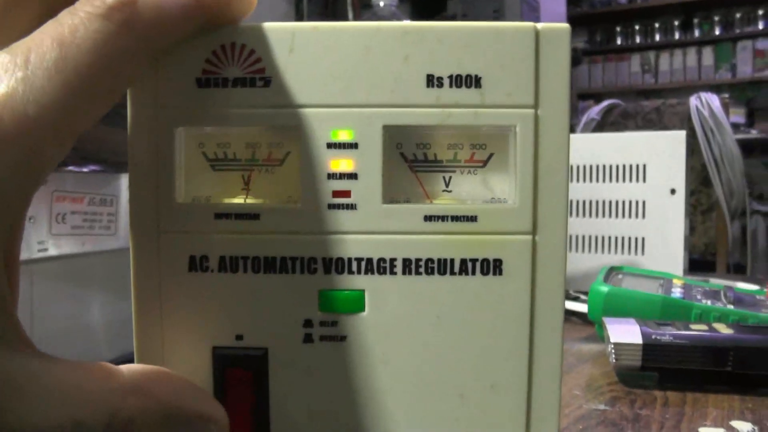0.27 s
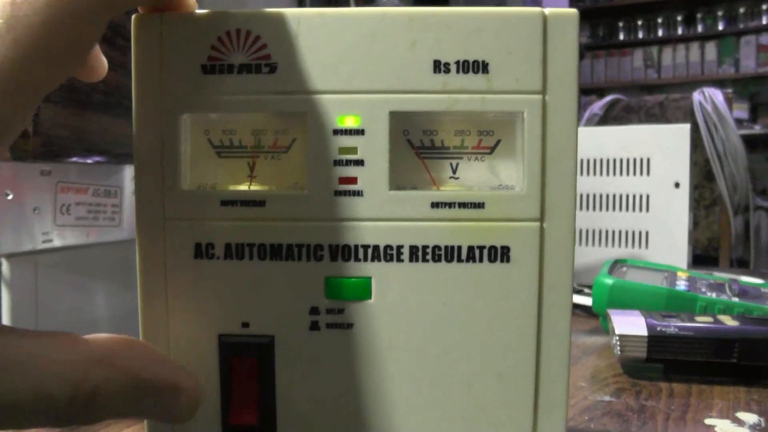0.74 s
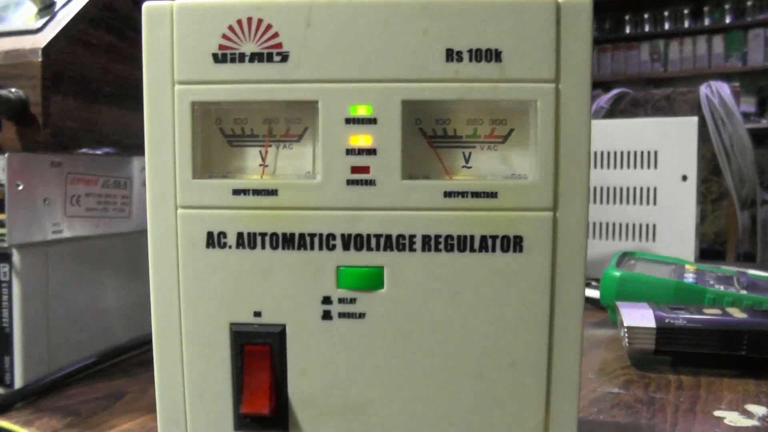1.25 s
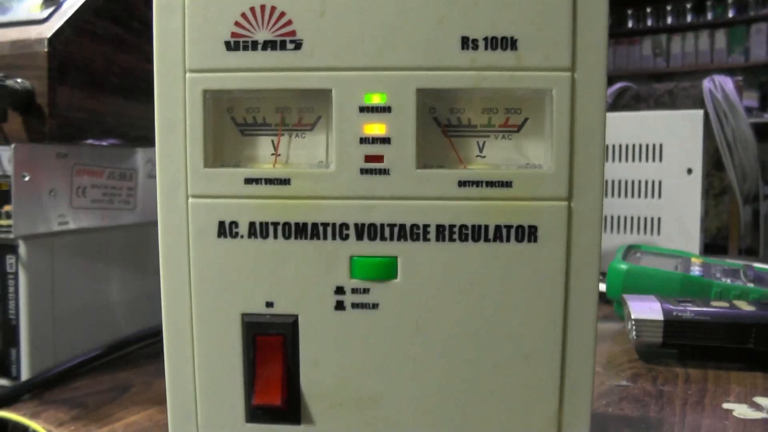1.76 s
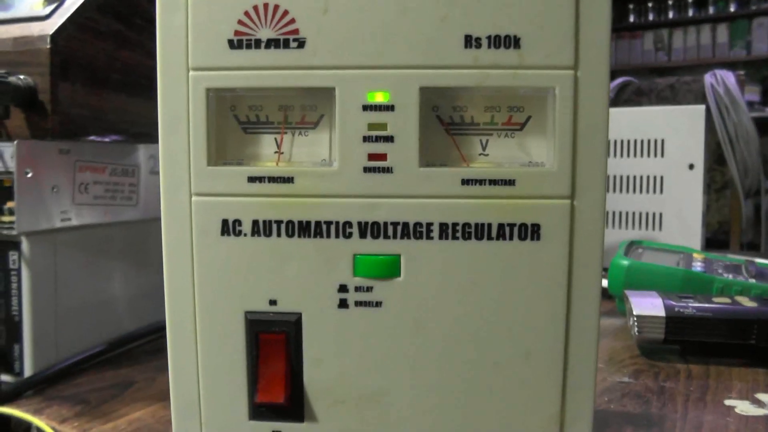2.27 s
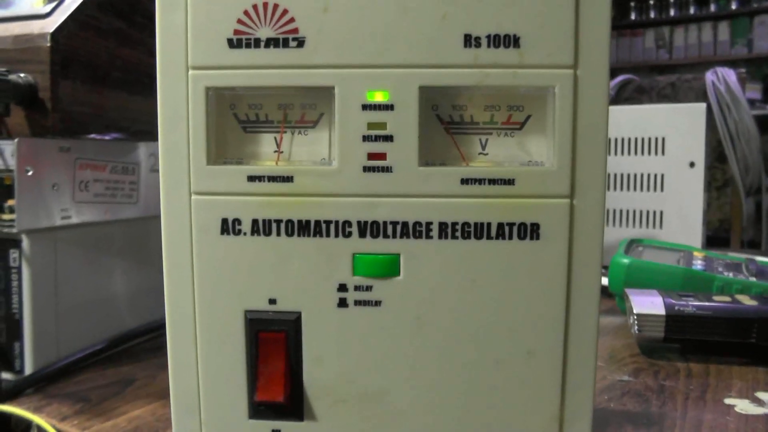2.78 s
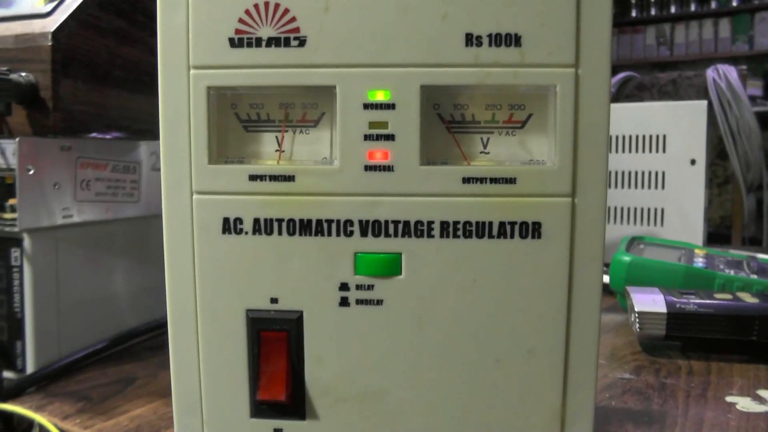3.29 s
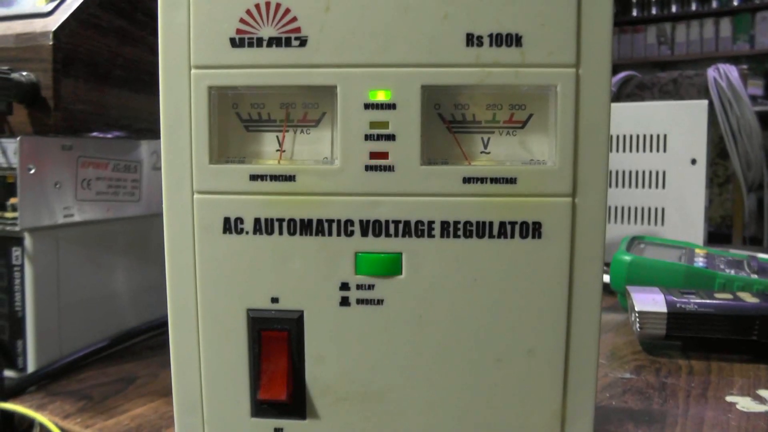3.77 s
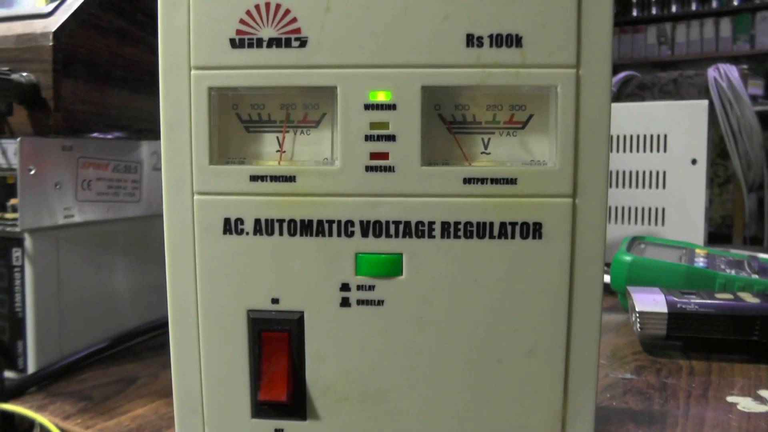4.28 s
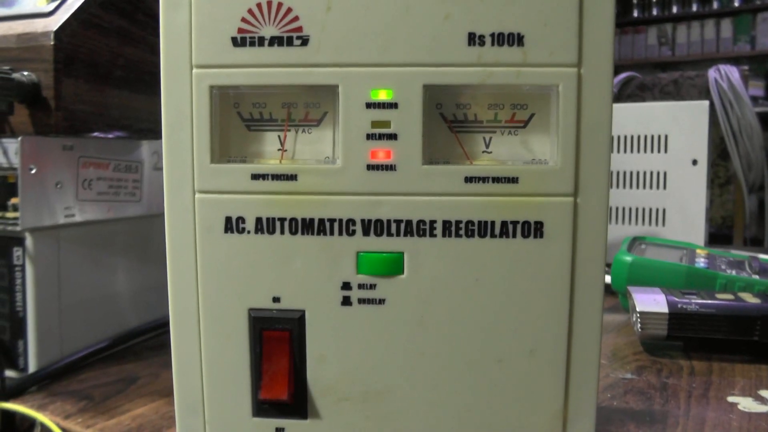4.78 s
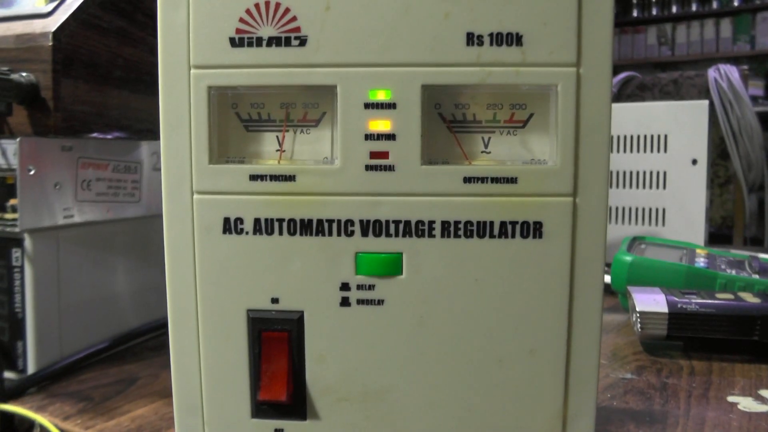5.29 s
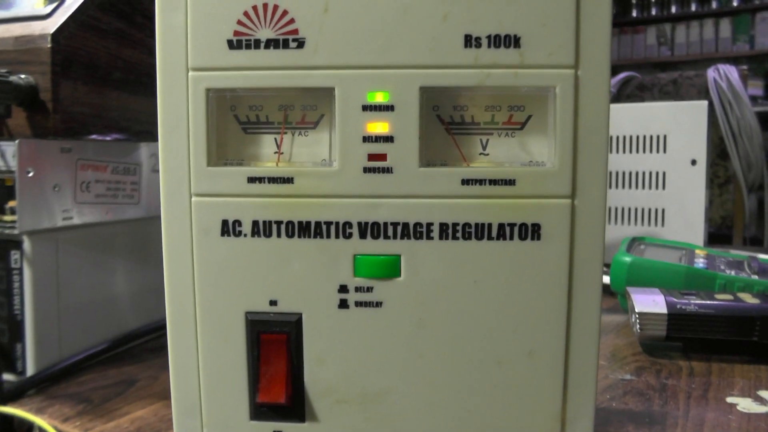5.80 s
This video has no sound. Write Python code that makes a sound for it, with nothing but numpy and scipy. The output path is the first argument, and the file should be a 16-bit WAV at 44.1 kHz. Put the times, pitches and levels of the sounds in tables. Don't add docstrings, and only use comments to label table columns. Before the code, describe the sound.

A quiet electrical hum on a workbench; a brief finger tick and sleeve brush, then four dry relay clacks alternating hard and bright with softer ones.

```python
import sys
import numpy as np
from scipy import signal
from scipy.fft import rfft, irfft
from scipy.io import wavfile
from scipy.ndimage import uniform_filter1d

SR = 44100
rng = np.random.default_rng(int(sys.argv[2]) if len(sys.argv) > 2 else 0)


def gain_from_decibels(decibels):
    exponent = np.asarray(decibels, float) / 20
    return 10 ** exponent


def dump(signal):
    limited = np.clip(np.atleast_2d(signal).T, -1, 1)
    pcm = np.round(limited * 32767).astype(np.int16)
    wavfile.write(sys.argv[1], SR, pcm)


N = 266496

BUZZ_HZ = 99.96
WALL_ECHO_S = .0101


def rms_one(x):
    return x / np.sqrt(np.mean(x ** 2) + 1e-20)


def at_hz(points, hz):
    points = np.array(points)
    return np.interp(np.log(hz + 1), np.log(points[:, 0]), points[:, 1])


def coloured(db_of_hz, size):
    hz = np.fft.rfftfreq(size, 1 / SR)
    return irfft(rfft(rng.standard_normal(size)) * gain_from_decibels(db_of_hz(hz)), size)


def drift(rate):
    knots = rng.standard_normal(400)
    return np.interp(np.arange(N) / SR * rate, np.arange(400), knots)


def high_pass(x, hz):
    return signal.sosfilt(signal.butter(2, hz, "high", fs=SR, output="sos"), x)


def overtones():
    # (f/Hz, width/Hz, lift/dB)
    core = [(2790, 210, 6), (3060, 260, 10), (3790, 350, 10)]
    k = np.arange(21, 59)
    lift = sum(db / (1 + (2 * (k * BUZZ_HZ - hz) / width) ** 2) for hz, width, db in core)
    chance_db = 2.5 * rng.standard_normal(len(k))
    return list(zip(k, -24 - .06 * (k - k[0]) + lift + chance_db))


def hum():
    # (multiple, level/dB)
    buzz = [(1, -20.5), (2, -3), (3, -15.5), (4, 2.5), (5, -9.5), (6, -8.5), (7, -5), (8, -15), (9, -12),
            (10, -14), (11, -8), (12, -14), (13, -11), (14, -4.5), (15, -2.5), (16, -4.5), (17, -39),
            (18, -7), (19, -3), (20, -13.5)]
    # (f/Hz, level/dB rms)
    motor = [(53, -74.5), (120.0, -59.5), (149.8, -64.5)]
    odd_lead, phase_chance = .25, .55
    tones = [(k * BUZZ_HZ, db - 63, odd_lead * (k % 2)) for k, db in [*buzz, *overtones()]]
    tones += [(hz, db, 0) for hz, db in motor]
    t, out = np.arange(N) / SR, np.zeros(N)
    for hz, db, lag in tones:
        cycles = hz * t + lag + phase_chance * rng.random()
        out += gain_from_decibels(db + 2.5 + 0.92 * drift(3.15)) * np.sin(2 * np.pi * cycles)
    return out


def air():
    # (f/Hz, level/dB per Hz)
    shape = [(15, -14), (40, -17), (80, -12.5), (105, -3), (170, -6.5), (320, -9), (450, -6.5), (720, -11),
             (900, -15), (1540, -16.5), (2100, -21), (3300, -21), (5000, -26.5), (9000, -35.5)]
    # (f/Hz, width/Hz, lift/dB)
    humps = [(120, 30, 2), (251, 61, 8), (315, 28, 10), (705, 64, 4.5), (2610, 88, 5), (3346, 400, 4.5),
             (5160, 200, 3.5), (6055, 350, 9)]
    # (f/Hz, side minus mid/dB)
    width_db = [(25, 6), (60, -2), (120, -9.5), (700, -9.5), (1300, -10.5), (2500, -20.5), (9000, -32)]
    level_db, fade_db_per_s = -51, 0.2143

    def colour(hz):
        return at_hz(shape, hz) + sum(db / (1 + (2 * (hz - f) / w) ** 2) for f, w, db in humps)

    mid = coloured(colour, N)
    side = coloured(lambda hz: colour(hz) + at_hz(width_db, hz), N)
    gain = gain_from_decibels(level_db - fade_db_per_s * np.arange(N) / SR + 0.56 * drift(3.28)) / np.std(mid)
    return gain * np.array([mid + side, mid - side])


def brushes():
    # (t/s at full strength, held/s, level/dB, swell/dB per s, fade/dB per s)
    moves = [
        (.47, .05, -74, 60, 60.5),
        (.869, .005, -52.5, 600.5, 500.5),
        (1.37, .12, -53, 44, 150),
        (2.8, .02, -61.5, 123, 87),
        (5.1, .02, -63.5, 119, 120.5),
    ]
    t, power = np.arange(N) / SR, 0
    for s, held, db, swell, fade in moves:
        level_db = db - swell * np.maximum(s - t, 0) - fade * np.maximum(t - s - held, 0)
        power = power + gain_from_decibels(level_db) ** 2
    return np.sqrt(uniform_filter1d(power, int(.01 * SR)))


def sleeve():
    # (f/Hz, level/dB per Hz)
    colour = [(880, -33.5), (1500, -7), (1930, 2), (2100, -8.5), (2910, -3), (3820, 0.5), (4190, -2.5),
              (14000, -22)]
    cloth = rms_one(coloured(lambda hz: at_hz(colour, hz), N))
    return cloth * brushes() * gain_from_decibels(.8 * drift(40.0))


def strike(touches, modes, spread_db, size, build_s=.00025):
    t, out = np.arange(size) / SR, np.zeros(size)
    for s, db in touches:
        age = np.maximum(t - s, 0)
        for hz, mode_db, t60 in modes:
            gain = gain_from_decibels(db + mode_db + spread_db * rng.standard_normal()) * rng.choice([-1, 1])
            decay = gain_from_decibels(-60 * age / min(t60, .13))
            out += gain * decay * np.sin(2 * np.pi * hz * age) * np.tanh(age / build_s)
    return out


def finger():
    # (t/s, level/dB)
    snaps = [
        (.8672, -60),
        (.8697, -30.5),
        (.8708, -31.5),
        (.8752, -33.5),
        (1.317, -60),
    ]
    # (f/Hz, level/dB, t60/s)
    modes = [(260, -11, .02), (520, -10, .015), (650, -3, .018), (1550, -9, .006), (2600, -10, .004),
             (3700, -11, .004), (5300, -10, .004), (7500, -15, .003)]
    size, out = int(1.5 * SR), np.zeros(N)
    out[:size] = high_pass(strike(snaps, modes, 0.84, size), 200)
    return out


def scatter(colour, size, early_db):
    # (f/Hz, t60/s)
    room = [(500, 0.31), (1500, 0.2), (3000, 0.22), (6000, 0.15), (10000, 0.17), (15000, 0.16)]
    t, out = np.arange(size) / SR, np.zeros(size)
    noise = rms_one(coloured(lambda hz: at_hz(colour, hz), size))
    edges = np.append(250 * 2 ** np.arange(0, 3, .5), np.arange(2000, 16400, 400))
    for low, high in zip(edges, edges[1:]):
        band = signal.sosfilt(signal.butter(2, [low, high], "band", fs=SR, output="sos"), noise)
        level_db, linger = rng.standard_normal(2) * [1.6, .08]
        t60 = at_hz(room, low) * np.exp(linger)
        out += band * gain_from_decibels(level_db - 60 * t / t60)
    before_wall = np.clip(t / .001, 0, 1) * gain_from_decibels(early_db - 500 * t)
    after_wall = 1 + .5 * np.exp(-(t - WALL_ECHO_S) / 0.0021)
    return out * np.where(t < WALL_ECHO_S, before_wall, after_wall)


def relay(events, bounces, modes, case, tail, case_db, tail_db, early_db, echo_db):
    size, lag = int(.3 * SR), round(WALL_ECHO_S * SR)

    def stroke():
        ringing = strike([(bounces[1][0], 0)], case, 1.0, size, build_s=.0008)
        blows = strike(bounces, modes, 1.5, size)
        echo = gain_from_decibels(echo_db) * high_pass(np.roll(blows, lag), 3800)
        room = gain_from_decibels(tail_db) * scatter(tail, size, early_db)
        return high_pass(blows + echo + gain_from_decibels(case_db) * ringing + room, 480)

    habit, out = stroke(), np.zeros((2, N + size))
    for s, db in events:
        mid = .95 * habit + .22 * stroke()
        other = stroke()
        side = gain_from_decibels(-12) * (high_pass(high_pass(other, 7500), 7500) + .25 * other)
        at = round(s * SR)
        out[:, at:at + size] += gain_from_decibels(db) * np.array([mid + side, mid - side])
    return out[:, :N]


def relay_pulls_in():
    # (t/s, level/dB)
    events = [
        (1.0368, -1.0),
        (3.2575, -1.5),
    ]
    # (t/s after the first touch, level/dB)
    bounces = [
        (0, -24),
        (.0006, 0),
        (.0031, -12),
        (.0049, -18),
        (.0067, -20),
    ]
    # (f/Hz, level/dB, t60/s)
    modes = [(3400, -18, .01), (3900, -19, .008), (4400, -18, .008), (5450, -14, .006), (6000, -14, .007),
             (6700, -17, .012), (7500, -21, .008), (8500, -8, .006), (9200, 0, .011), (9900, -13, .02),
             (11100, -17, .01), (12650, -8, .009), (13330, 0, .008), (14100, -11, .006), (15150, -20, .008)]
    # (f/Hz, level/dB, t60/s)
    case = [(560, -11, .05), (870, -13, .05), (1160, -18, .04), (1350, -9, .015), (1600, -1, .012),
            (1900, 0, .012), (2200, -2, .03), (2650, 5, .04), (2950, 5, .045), (3200, -13, .12),
            (3800, -12, .13), (4450, -11, .08), (6250, -9, .13), (6620, -8, .1), (8104, -7, .12),
            (8198, -7, .11), (8420, -9, .1), (9230, -4, .11), (10070, -7, .12), (10910, -9, .1),
            (9997, -4, .13), (12685, -10, .1), (13220, -11, .08)]
    # (f/Hz, level/dB per Hz)
    tail = [(350, -49), (600, -28), (1200, -19), (1700, -25), (2700, -8.5), (3500, -13.5), (4400, -11),
            (5200, -8), (6500, -5), (8300, -2.5), (10000, -2.5), (11500, -1.5), (13200, -7), (14300, -15),
            (15300, -10), (16000, -7)]
    return relay(events, bounces, modes, case, tail,
                 case_db=-21.0, tail_db=-10, early_db=3.5, echo_db=-13.5)


def relay_drops_out():
    # (t/s, level/dB)
    events = [
        (2.101, -12.5),
        (5.3009, -12.5),
    ]
    # (t/s after the first touch, level/dB)
    bounces = [
        (0, -24),
        (.0004, 0),
        (.0018, -4),
        (.0033, -4),
        (.0049, -8),
        (.0068, -13),
    ]
    # (f/Hz, level/dB, t60/s)
    modes = [(2350, -24, 0.039), (2800, -7, 0.011), (4085, -27.5, 0.039), (4940, -12.5, 0.033),
             (5350, -14.5, 0.024), (6280, -4.5, 0.016), (6780, -0.5, 0.014), (7570, -10, 0.028),
             (8700, -8, 0.008), (9160, -11, 0.0063), (9960, 4, 0.0062), (11800, -11, 0.011),
             (12650, -8, 0.009), (13760, -4, .008), (14140, -5, .012), (15570, -8, .01)]
    # (f/Hz, level/dB, t60/s)
    case = [(480, -1, .13), (855, 1, .065), (1060, -4, .035), (1270, 1, .05), (1900, -14, .04),
            (4915, -9, .11), (5400, -4, .13), (5895, -12, .13), (6195, -7, .13), (6257, -5, .13),
            (6585, -7, .11), (6675, -3, .12), (6741, -1, .11), (6860, -6, .12), (7085, -8, .1),
            (7548, -5, .11), (8405, -8, .13), (8560, -8, .1), (9878, -9, .07), (11100, -14, .08),
            (13840, -13, .06)]
    # (f/Hz, level/dB per Hz)
    tail = [(350, -55), (600, -28), (1240, -11), (1930, -30), (2700, -14.5), (4100, -21), (5000, -9),
            (6640, 2), (8400, -6.5), (10000, -9), (10800, -18), (12500, -10), (14100, -12), (16000, -26)]
    return relay(events, bounces, modes, case, tail,
                 case_db=-18.0, tail_db=-2, early_db=-4, echo_db=-8.5)


def scene():
    buzz = hum() * gain_from_decibels([[-.2], [.2]])
    hand = sleeve() + finger()
    clicks = (relay_pulls_in() + relay_drops_out()) * gain_from_decibels([[.27], [-.27]])
    return buzz + air() + hand + clicks


def band_limit(x):
    return signal.sosfilt(signal.butter(12, 16720, fs=SR, output="sos"), x)


def record(dry):
    # (f/Hz, level/dB per Hz)
    colour = [(2000, -23), (6000, -24), (8000, -3.5), (11000, 4), (14000, 4), (16000, -0.3)]
    shared, left, right = (rms_one(coloured(lambda hz: at_hz(colour, hz), N)) for k in range(3))
    hiss = gain_from_decibels(-65) * shared + gain_from_decibels(-64) * np.array([left, right])
    rounded = 1.6 * np.tanh((dry + hiss) / 1.6)
    rounded = rounded - .03 * rounded ** 2
    top_cut = signal.ellip(12, .5, 36, 15750, fs=SR, output="sos")
    return band_limit(signal.sosfilt(top_cut, rounded))


dry = scene()
out = record(dry)
dump(out)
```